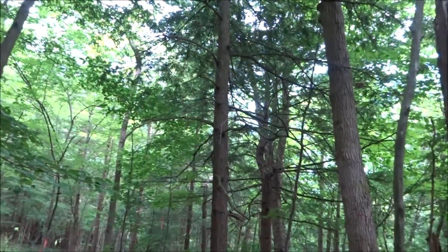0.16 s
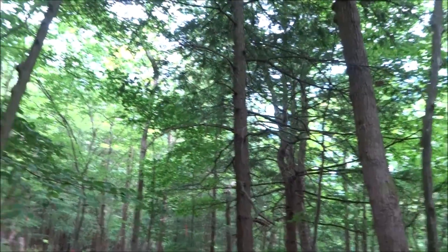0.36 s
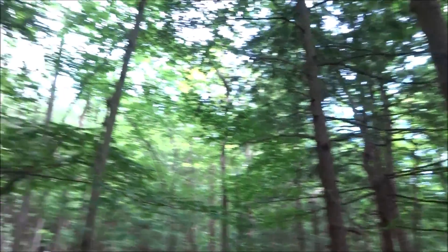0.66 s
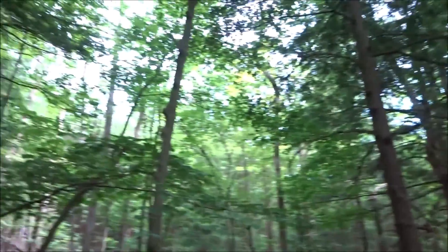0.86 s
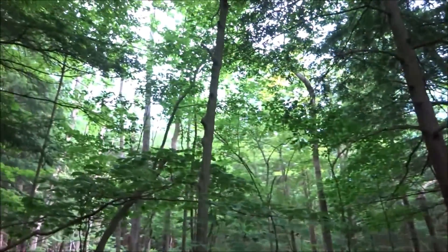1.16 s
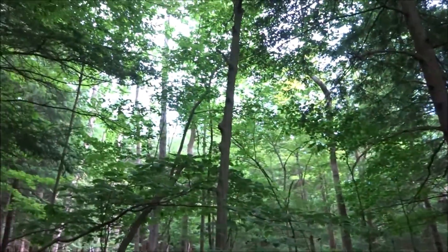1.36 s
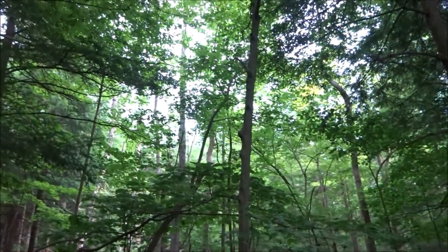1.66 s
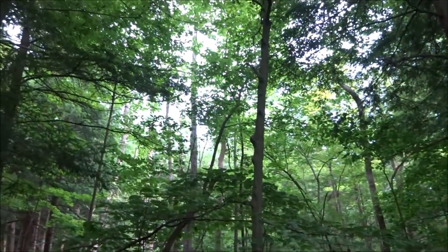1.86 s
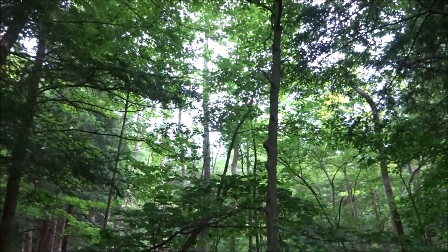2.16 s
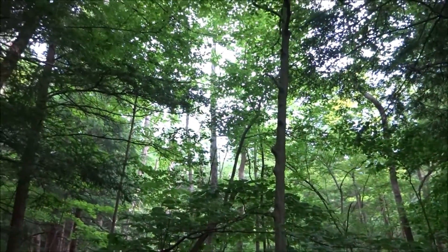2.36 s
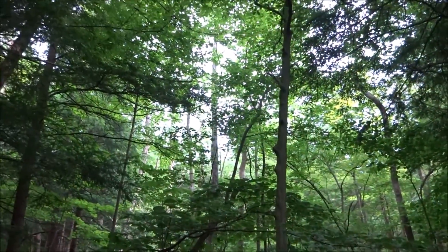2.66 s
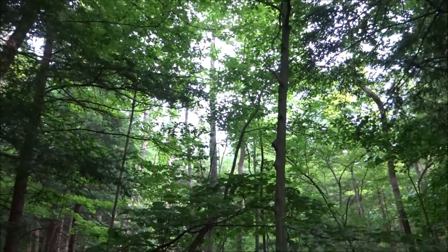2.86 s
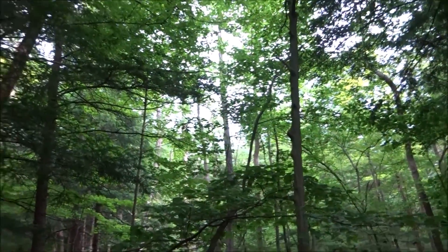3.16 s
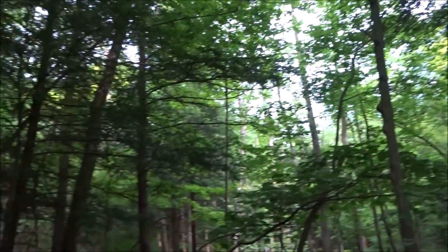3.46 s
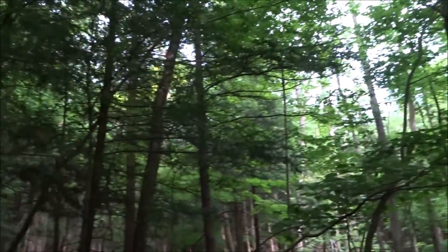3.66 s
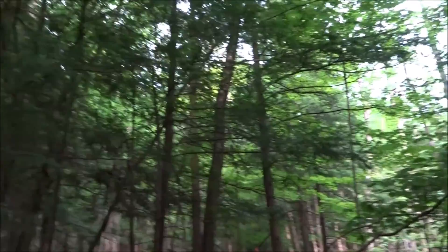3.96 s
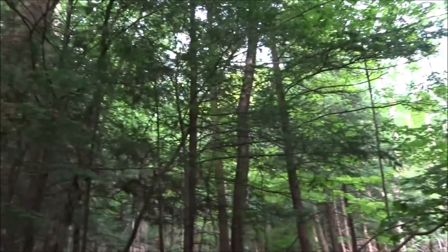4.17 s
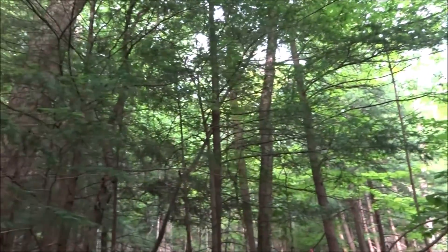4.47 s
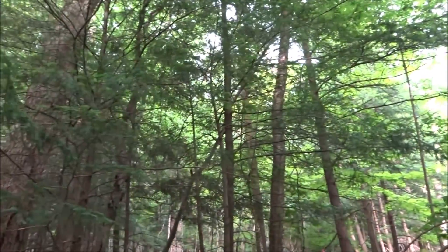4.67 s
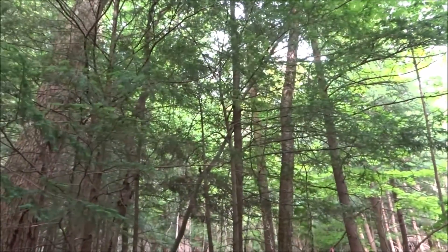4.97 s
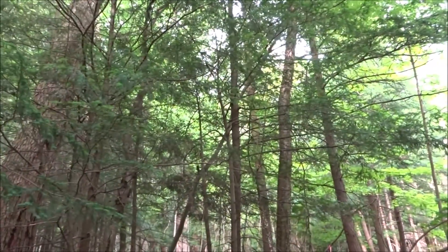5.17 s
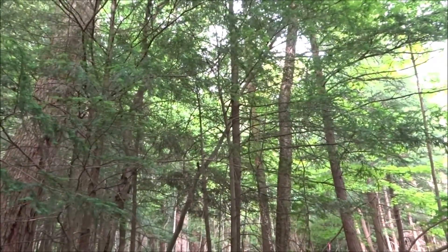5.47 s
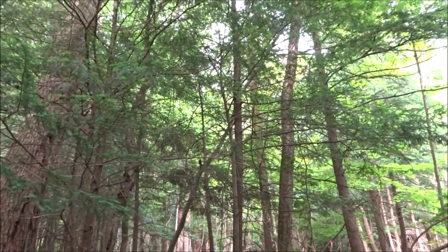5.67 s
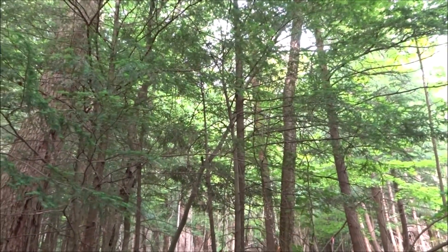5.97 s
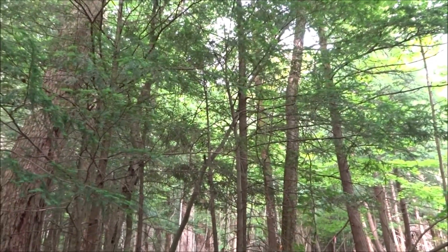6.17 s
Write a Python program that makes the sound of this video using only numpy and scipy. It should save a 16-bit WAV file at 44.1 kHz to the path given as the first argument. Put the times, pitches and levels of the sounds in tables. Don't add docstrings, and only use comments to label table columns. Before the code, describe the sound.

A distant owl finishes one hooting phrase and gives another with a drooping last note, then a close jay screams twice in echoing woods.

```python
import sys
import numpy as np
from scipy import signal
from scipy.fft import rfft, irfft
from scipy.io import wavfile
from scipy.ndimage import uniform_filter1d

SR = 44100
rng = np.random.default_rng(int(sys.argv[2]) if len(sys.argv) > 2 else 0)


def attenuation_scalar(level_db):
    decades = np.asarray(level_db, float) / 20
    return 10 ** decades


def file_out(sig):
    cols = np.atleast_2d(sig).T
    lim = np.clip(cols, -1, 1)
    pcm = np.round(lim * 32767).astype(np.int16)
    wavfile.write(sys.argv[1], SR, pcm)


N = 279153
T = np.arange(N) / SR

# start_s, time_to_top_s, start_hz, top_hz, effort_db
SHORT_HOOTS = [
    (0.0, .045, 530, 565, -37),
    (0.128, .13, 480, 642, -32.5),
    (1.03, 0.14, 300, 631.7, -31.5),
    (1.359, .09, 560, 654.3, -31.5),
    (1.73, 0.079, 334, 577.7, -31.5),
]
# time_s, pitch_hz, effort_db
LONG_HOOT = [
    (1.883, 325, -40),
    (1.914, 342.2, -40),
    (1.945, 538, -33),
    (2.061, 651.5, -31.5),
    (2.26, 617.7, -30.5),
    (2.45, 490, -29.5),
    (2.494, 407, -35),
    (2.77, 342.5, -37.5),
    (2.87, 299.6, -45.5),
]
# pitch_hz, level_db
OWL_THROAT = [(300, -12), (400, -12), (500, -9), (570, -4), (640, -2), (740, 2), (900, -12.5), (1200, -57)]
# start_s, length_s, attack_s
SCREAMS = [
    (4.947, .405, 0.045),
    (5.631, 0.33, 0.0064),
]
# time_after_start_s, pitch_hz
SCREAM_PITCH = [
    [(0, 643.7), (.013, 727), (.03, 863), (.055, 892.6), (.147, 835.8), (.275, 783), (.405, 729.6)],
    [(0, 645), (.012, 776.4), (.025, 855), (.05, 879.3), (.15, 825.4), (.226, 798.7), (.36, 766)],
]
# pitch_hz, level_db
JAY_THROAT = [(1300, -55), (1700, -35), (2000, -43.5), (2500, -23), (2850, -16), (3300, -2), (3650, -2.5),
              (4250, -15.5), (4800, -18.5), (5600, -25), (7000, -18.5), (8500, -23), (12000, -36),
              (14800, -44)]
# start_s, peak_db, pitch_hz, t60_s (time to fade by 60 dB)
TICKS = [
    (.421, -22.5, 8300, 0.001),
    (.788, -31.5, 1710, 0.012),
    (2.025, -49, 109.4, 0.034),
    (3.892, -50, 3000, 0.011),
    (3.923, -41.5, 1880, 0.018),
]
# pitch_hz, level_db_per_hz
AIR_MID = [(18, -72), (30, -51), (85, -24.5), (130, -28.5), (308, -13), (380, -8.5), (877, -6), (974, 0),
           (1330, -12.5), (1600, -9), (2310, -15.5), (7700, -20.5), (15600, -22)]
# pitch_hz, level_db_per_hz
AIR_SIDE = [(18, -72), (30, -56), (380, -7), (641, -0.5), (693, -4), (901, 3), (1330, -8), (1640, -6),
            (3610, -16), (9250, -26), (15600, -34)]
# pitch_hz, level_db
WOOD_COLOUR = [(250, -29), (400, 2.5), (620, 0.5), (1000, 2.5), (2400, 4), (3100, -5.5), (3700, -8.5),
               (7000, -1.5), (12000, -8.5)]


def owl():
    hz, effort_db, on = hoot_track()
    throat_hz, throat_db = np.transpose(OWL_THROAT)

    def throat(f):
        return np.interp(np.log(f), np.log(throat_hz), throat_db)

    pitch_shake = 1 + 0.005 * wander(41.5)
    phase = 2 * np.pi * np.cumsum(hz * pitch_shake) / SR
    voice = attenuation_scalar(effort_db + throat(hz)) * np.sin(phase)
    voice = voice + attenuation_scalar(effort_db - 7 + throat(2 * hz)) * np.sin(2 * phase)
    voice = voice + attenuation_scalar(effort_db + 8.5 + throat(3 * hz)) * np.sin(3 * phase)
    voice = voice * (1 + 0.2 * wander(130))
    flutter = attenuation_scalar(1.4 * wander(45))
    old_hoot = colour(rng.standard_normal(N), [(250, -42), (400, -17), (580, -0.5), (800, -18), (1200, -61)])
    before = attenuation_scalar(-38.5 - 40.4 * T) * unit(old_hoot)
    voice = np.sqrt(2) * attenuation_scalar(1.5) * voice * flutter * on + before
    return wood(voice, pan_db=2, near_db=-7, near_s=0.05, tail_db=-1, t60=1.55,
                slope_db=-28.5, slope_s=0.207, side_db=-10.5, rise_s=0.16)


def hoot_track():
    fall_s, fall_share = 0.08, 0.19
    fall_db, climb_db = -11, -8
    s, hz, db = np.transpose(LONG_HOOT)
    hz, db, on = np.interp(T, s, hz), np.interp(T, s, db), gate(s[0], s[-1] - s[0], 0.0084)
    slack = np.clip((420 - hz) / 30, 0, 1)
    hz = hz * (1 + 0.018 * slack * np.sin(2 * np.pi * 13 * T))
    for start, rise, low_hz, top_hz, top_db in SHORT_HOOTS[::-1]:
        end = start + rise + fall_s
        climb = np.clip(1 - (T - start) / rise, 0, 1) ** 2
        fall = np.clip((T - start - rise) / fall_s, 0, 1) ** 2
        here = T < end
        hz = np.where(here, top_hz * (1 - fall_share * fall) - (top_hz - low_hz) * climb, hz)
        db = np.where(here, top_db + fall_db * fall + climb_db * climb, db)
        on = np.where(here, gate(start, rise + fall_s, 0.008), on * gate(end, T[-1], 0.015))
    return hz, db, on


def jay():
    hz, level_db, rasp, beak_db, on = scream_track()
    rasp = np.clip(rasp, 0, 1)
    phase = 2 * np.pi * np.cumsum(hz * (1 + 0.00202 * wander(67))) / SR
    phase = phase + 0.21 * np.sqrt(rasp) * wander(440)
    buzz = np.zeros(N)
    for k in range(1, 18):
        partial_db = (1.3 + 1.2 * (k != 4)) * wander(45)
        if k > 4:
            partial_db = partial_db + beak_db + (k % 2) * np.clip(beak_db - 3, None, 0)
        buzz = buzz + attenuation_scalar(partial_db) * np.sin(k * phase + k * k)
    roughness = 0.44 * wander(480) + 0.32 * np.cos(phase / 2)
    uneven = np.sqrt(1 - rasp) + np.sqrt(rasp) * roughness
    breath = attenuation_scalar(-8) * rng.standard_normal(N)
    voice = colour(buzz * uneven + breath, JAY_THROAT)
    voice = voice / np.sqrt(uniform_filter1d(voice ** 2, size=1000))
    puff_shape = np.zeros(N)
    for start, _, _ in SCREAMS:
        t = np.clip(T - start - 0.004, 0, None)
        puff_shape = puff_shape + t / 0.0046 * np.exp(-t / 0.0093)
    puff_points = [(2000, -42), (3800, -32), (4700, 9), (5600, -5), (9000, -22)]
    puff = puff_shape * unit(colour(rng.standard_normal(N), puff_points))
    voice = voice * attenuation_scalar(level_db - 3.5) * on + attenuation_scalar(-32.5) * puff
    return wood(voice, pan_db=1, near_db=-7.5, near_s=0.048, tail_db=-1.5, t60=0.96,
                slope_db=-24, slope_s=0.42, side_db=-12, rise_s=0.011)


def scream_track():
    peak_s, peak_db, attack_db = 0.14, -11, -14
    swell_db_per_s, fade_db_per_s = 37, 42.5
    break_s, break_width_s, break_db = 0.1728, 0.012, -13
    out = None
    for k, (start, length, attack) in enumerate(SCREAMS):
        t = np.clip(T - start, 0, length)
        hz = uniform_filter1d(np.interp(t, *np.transpose(SCREAM_PITCH[k])), size=500)
        crack = np.exp(-((t - break_s) / break_width_s) ** 2)
        db = peak_db + attack_db * np.exp(-t / attack) + break_db * crack
        db = db - swell_db_per_s * np.clip(peak_s - t, 0, None)
        db = db - fade_db_per_s * np.clip(t - peak_s, 0, None)
        rasp = np.exp(-(t / 0.02) ** 2)
        rasp = rasp + 0.13 * np.clip((t - peak_s) / break_width_s, 0, 1)
        rasp = rasp + 0.78 * np.clip(1 - (length - t) / 0.14, 0, 1)
        beak_db = -4.5 + 11 * crack - 6 * np.exp(-(t / 0.08) ** 2)
        track = np.array([hz, db, rasp, beak_db, gate(start, length, 0.014)])
        out = track if k == 0 else np.where(T >= start, track, out)
    return out


def whistle():
    start_s, length_s, pulse_hz = 4.445, 0.36, 37.5
    t = np.clip(T - start_s, 0, None)
    hz = 3520 - 150 * np.exp(-t / 0.0209)
    db = -54 - 25 * t
    db = db + 2.5 * wander(pulse_hz) + 3 * np.sin(2 * np.pi * pulse_hz * t)
    tone = attenuation_scalar(db) * gate(start_s, length_s, 0.03) * np.sin(2 * np.pi * np.cumsum(hz) / SR)
    return wood(tone, pan_db=0, near_db=-8, near_s=0.03, tail_db=-3, t60=1.1,
                slope_db=-30, slope_s=0.15, side_db=-6, rise_s=0.05)


def twigs():
    out = np.zeros(N)
    for start, db, hz, t60 in TICKS:
        t = np.clip(T - start, 0, None)
        rise = 1 - np.exp(-3 * hz * t / 2)
        out = out + rise * attenuation_scalar(db - 60 * t / t60) * np.sin(2 * np.pi * hz * t)
    return out


def air():
    mid = unit(colour(rng.standard_normal(N), AIR_MID)) * attenuation_scalar(-52)
    side = unit(colour(rng.standard_normal(N), AIR_SIDE)) * attenuation_scalar(-52)
    both = mid + side * np.array([[1], [-1]])
    rumble = unit(colour(rng.standard_normal(N), [(20, 6), (45, -6), (90, 5), (200, -47)]))
    rumble = rumble * attenuation_scalar(-101 + 7.1 * wander(6.3))
    low = signal.sosfilt(signal.butter(2, 1300, fs=SR, output="sos"), both)
    swell = attenuation_scalar(1.1 * wander(1.5) + 1.2 * wander(12))
    hiss = (both - low) * attenuation_scalar(0.4 * wander(3))
    return low * swell + rumble + hiss


def wood(x, pan_db, near_db, near_s, tail_db, t60, slope_db, slope_s, side_db, rise_s):
    t = T[:SR * 2]
    noise = rng.standard_normal((4, len(t)))
    near = attenuation_scalar(near_db) * np.exp(-t / near_s) / np.sqrt(near_s * SR / 2)
    tail = attenuation_scalar(tail_db - 60 * t / t60) * np.clip(t / rise_s, 0, 1) ** 2 / np.sqrt(t60 * SR / 14)
    slope = attenuation_scalar(slope_db) * np.exp(-((t - slope_s) / 0.0075) ** 2) / np.sqrt(0.088 * SR)
    far = colour(noise[2:], WOOD_COLOUR)
    dull = signal.sosfilt(signal.butter(2, 4200, fs=SR, output="sos"), far)
    far = dull + (far - dull) * attenuation_scalar(3 - 15 * t)
    echoes = near * noise[:2] + (tail + slope) * far
    mid, side = signal.fftconvolve(echoes, x[None], axes=1)[:, :N]
    pan = attenuation_scalar(np.array([[pan_db], [-pan_db]]) / 2)
    return (x + mid) * pan + attenuation_scalar(side_db) * side * np.array([[1], [-1]])


def gate(start, length, fade_s):
    return np.clip(np.minimum(T - start, start + length - T) / fade_s, 0, 1)


def wander(rate):
    k = int(SR / rate)
    return unit(uniform_filter1d(uniform_filter1d(rng.standard_normal(N), k), k))


def colour(x, points):
    hz, db = np.transpose(points)
    bins = np.arange(x.shape[-1] // 2 + 1) * SR / x.shape[-1] + 1
    gain = attenuation_scalar(np.interp(np.log(bins), np.log(hz), db))
    return irfft(rfft(x) * gain, x.shape[-1])


def unit(x):
    return x / np.sqrt(np.mean(x ** 2))


def scene():
    return owl() + jay() + whistle() + twigs() + air()


def band_limit(x):
    return signal.sosfilt(signal.butter(12, 15760, fs=SR, output="sos"), x)


def record(dry):
    mid, side = (dry[0] + dry[1]) / 2, (dry[0] - dry[1]) / 2
    power = uniform_filter1d(mid ** 2, size=9000)
    loud = uniform_filter1d(np.clip(power / attenuation_scalar(-24.5) ** 2 - 1, 0, 1), size=1000)
    low = signal.sosfiltfilt(signal.butter(3, 420, fs=SR, output="sos"), side)
    side = side - loud * low
    treble_cut = signal.ellip(8, 0.2, 70, 15700, fs=SR, output="sos")
    both = signal.sosfilt(treble_cut, [mid + side, mid - side])
    return band_limit(both)


dry = scene()
out = record(dry)
file_out(out)
```